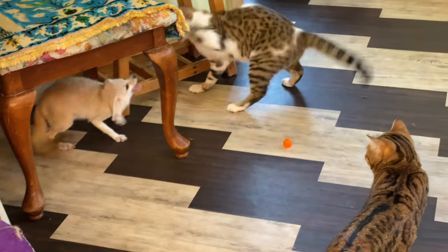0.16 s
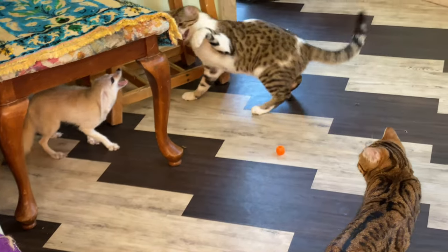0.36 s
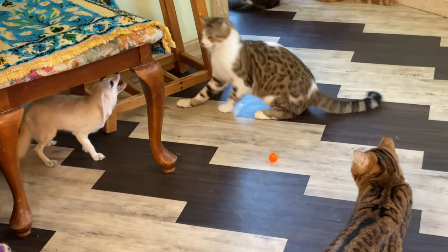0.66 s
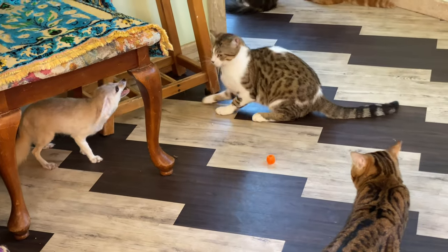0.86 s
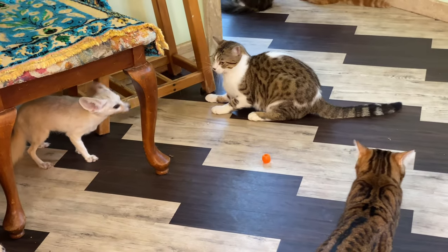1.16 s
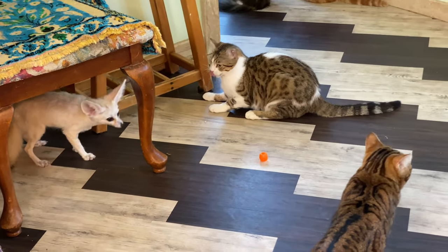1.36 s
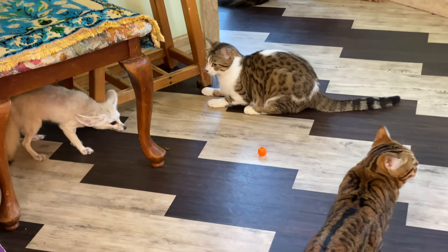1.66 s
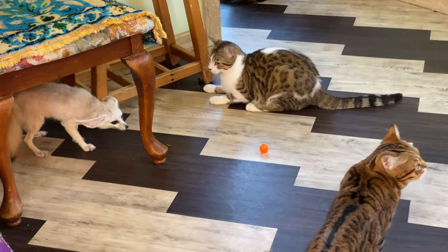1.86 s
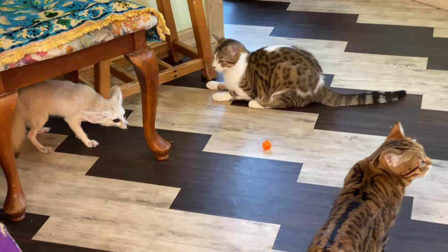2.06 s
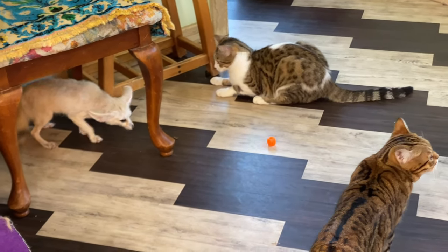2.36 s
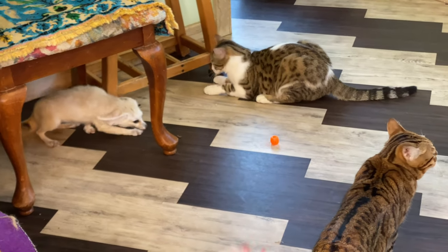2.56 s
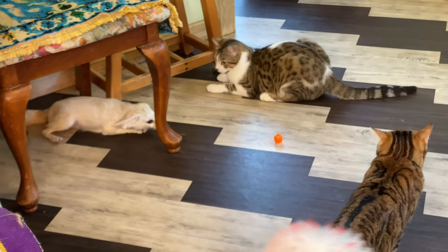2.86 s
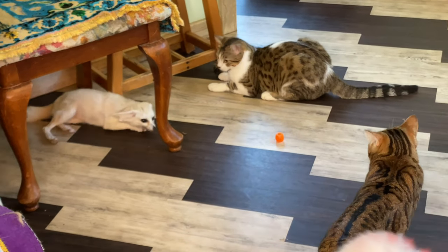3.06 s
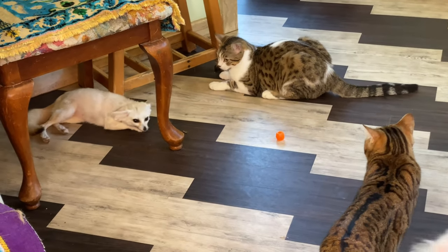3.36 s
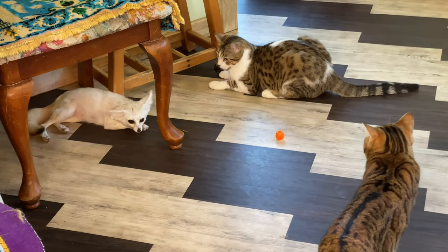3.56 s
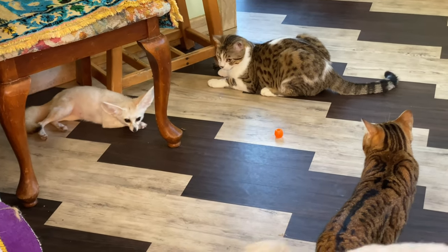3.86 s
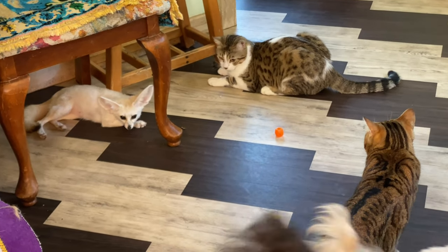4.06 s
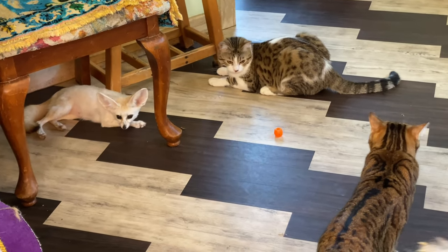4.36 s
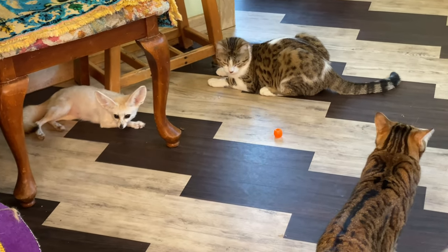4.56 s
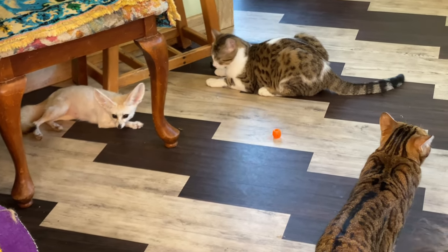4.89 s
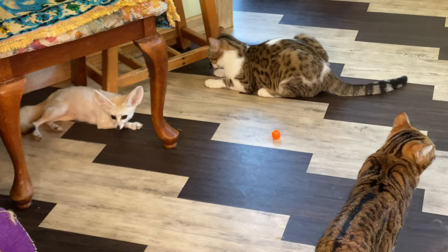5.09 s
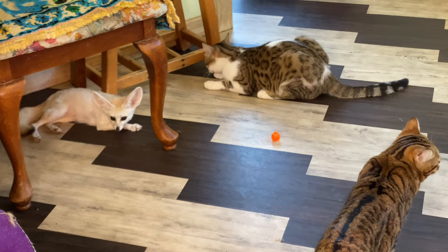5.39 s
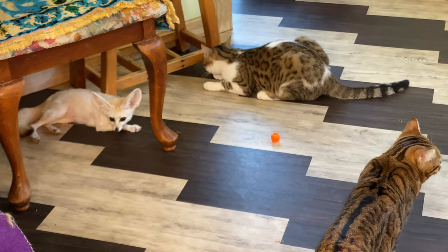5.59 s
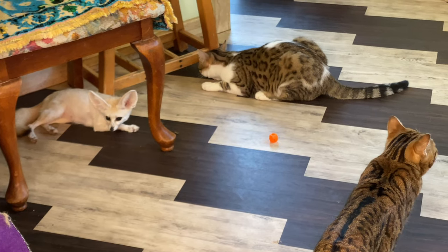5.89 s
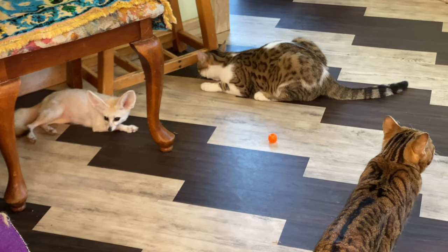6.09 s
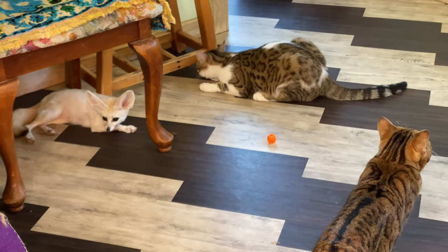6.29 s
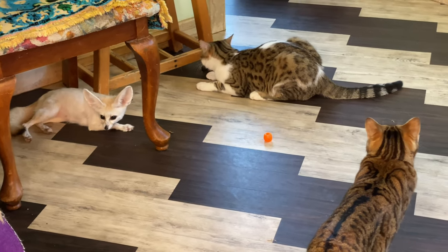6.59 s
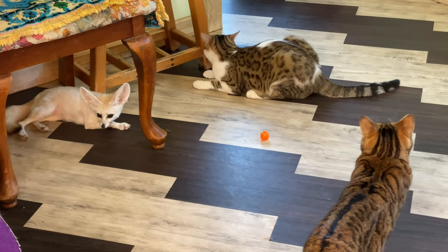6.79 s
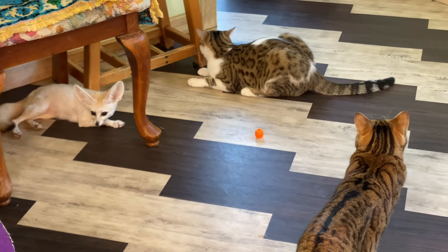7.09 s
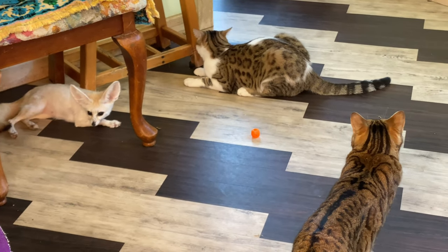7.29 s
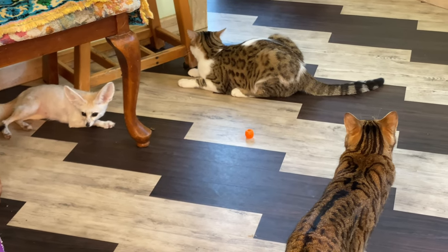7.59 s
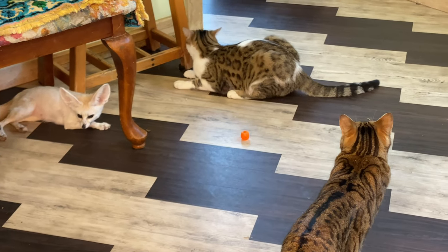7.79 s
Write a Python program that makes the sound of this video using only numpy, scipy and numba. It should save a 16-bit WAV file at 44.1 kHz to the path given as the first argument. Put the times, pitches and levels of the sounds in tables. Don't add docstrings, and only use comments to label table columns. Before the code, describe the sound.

Indoors, a fennec fox hisses and shrieks raspily, then gives bursts of nasal squawks and yelps over low house rumble, ending with tiny claw ticks.

```python
import sys
import numpy as np
from scipy import signal
from scipy.fft import rfft, irfft
from scipy.io import wavfile
from numba import njit

SR = 44100
rng = np.random.default_rng(int(sys.argv[2]) if len(sys.argv) > 2 else 0)


def dump(signal):
    limited = np.clip(np.atleast_2d(signal).T, -1, 1)
    pcm = np.round(limited * 32767).astype(np.int16)
    wavfile.write(sys.argv[1], SR, pcm)


def convert_level_to_amplitude(level_db):
    exponent = np.asarray(level_db, float) / 20
    return 10 ** exponent


N = 350138


def unit(x):
    return x / np.sqrt(np.mean(x ** 2) + 1e-20)


def along(points, hz):
    table = np.array(points, float)
    return np.interp(np.log(hz + 1), np.log(table[:, 0] + 1), table[:, 1])


def spread(rows, rise_s, fall_s):
    s, *columns = np.transpose(rows)
    first = round(s[0] * SR)
    t = np.arange(first, round(s[-1] * SR)) / SR
    gate = np.clip((t - s[0]) / rise_s, 0, 1) * np.clip((s[-1] - t) / fall_s, 0, 1)
    return first, [np.interp(t, s, c) for c in columns], gate


def drift(rate_hz):
    r = np.exp(-2 * np.pi * rate_hz / SR)
    slow = signal.lfilter([1], [1, -2 * r, r * r], rng.standard_normal(N + SR))
    return unit(slow[SR:])


def band_pass(x, low_hz, high_hz):
    return signal.sosfilt(signal.butter(2, [low_hz, high_hz], "band", fs=SR, output="sos"), x)


@njit
def resonate(x, cos_w, r):
    y = np.zeros(len(x))
    for i in range(2, len(x)):
        y[i] = (1 - r * r) / 2 * (x[i] - x[i - 2]) + 2 * r * cos_w[i] * y[i - 1] - r * r * y[i - 2]
    return y


def cavity(x, hz, width_hz):
    cos_w = np.cos(2 * np.pi * hz / SR) * np.ones(len(x))
    r = np.exp(-np.pi * width_hz / SR)
    return resonate(resonate(x, cos_w, r), cos_w, r)


def body(x, modes):
    total = 0
    for k, (hz, width_hz, db) in enumerate(modes):
        total = total + (-1) ** k * convert_level_to_amplitude(db) * unit(cavity(x, hz, width_hz))
    return unit(total)


def posture():
    # t/s, throat f/Hz, mouth f/Hz, jaw shut [0-1], lips drawn back [0-1]
    poses = [(0, 1900, 4050, .1, 0.73), (.45, 1900, 3620, .1, 0.74), (.9, 2000, 3300, 0.18, 0.78),
             (1.6, 1700, 3450, 0.73, .25), (1.8, 2200, 3300, .22, .75), (2.35, 1900, 3500, .3, .74),
             (2.9, 1720, 3350, .3, .95), (3.26, 2400, 3300, .55, .99), (3.45, 2000, 3130, .6, .8),
             (4.08, 1800, 3400, .7, .5), (4.3, 1804, 4350, 0.59, 0.3), (4.5, 1800, 4580, 0.7, 0.43),
             (4.87, 1950, 2900, .85, .3), (5.08, 1199, 2870, 0.68, .2), (5.31, 1762, 2800, 0.98, .01),
             (5.7, 1400, 2900, .5, .62), (6.199, 2200, 3900, .95, .98), (7.45, 1708, 4040, 0.49, 0.75)]
    s, *columns = np.transpose(poses)
    return [np.interp(np.arange(N) / SR, s, c) for c in columns]


def cries(throat_hz, mouth_hz):
    # t/s, f/Hz, effort level/dB
    squawks = [
        [(2.245, 610, -49), (2.295, 600, -30), (2.325, 710, -24), (2.413, 650, -34), (2.52, 700, -37)],
        [(2.55, 577, -40), (2.606, 669.6, -25.5), (2.66, 560.7, -27.5), (2.75, 586, -37)],
        [(2.835, 597, -29), (2.875, 686.3, -26), (2.92, 710, -27), (2.94, 715, -36)],
        [(3.485, 628, -38), (3.53, 675, -40), (3.575, 712, -27), (3.6, 706, -31), (3.62, 687, -43)],
        [(3.985, 642.6, -35.5), (4.021, 634.5, -36.5), (4.043, 743, -29.5), (4.125, 765.7, -32)],
    ]
    yelps = [
        [(6.085, 646.4, -39.5), (6.155, 726, -28.5), (6.185, 585, -30), (6.24, 547, -32)],
        [(6.34, 660, -27.5), (6.4, 610, -26), (6.43, 545, -30), (6.48, 527, -30)],
    ]
    whines = [
        [(4.28, 1900, -49), (4.36, 1851, -43), (4.45, 1740, -37), (4.5, 1800, -44)],
    ]
    shrieks = [
        [(4.49, 1950, -44), (4.53, 2006, -41), (4.6, 2090, -34), (4.68, 2060, -39.5), (4.81, 2050, -41)],
    ]
    screams = [
        [(.02, 946, -51), (.04, 1005, -37), (.178, 975, -46), (.25, 1053, -36.5)],
        [(.42, 1246, -44.5), (.454, 1212, -53.5), (.512, 1028, -44), (.66, 1317, -42)],
    ]
    groans = [
        [(.89, 337, -47), (1.02, 300, -51), (1.1, 286, -53)],
        [(1.755, 410, -50), (1.8, 412, -42), (1.86, 415, -50)],
        [(3.24, 500, -46), (3.28, 470, -42), (3.32, 438, -46), (3.36, 425, -52), (3.43, 422, -60)],
    ]
    peeps = [
        [(1.5, 765, -54.5), (1.58, 790, -55), (1.63, 870, -49), (1.7, 820, -48), (1.76, 769, -46)],
        [(3.33, 690, -50), (3.44, 690, -51)],
    ]
    # first, second, third partial level/dB, pitch wobble share, upper level/dB gained as mouth opens
    kinds = [(squawks, (-.3, -2.5, -16, .025, 7)), (yelps, (-20, 0.1, -17, .048, 1.5)), (whines, (0.1, -12, -25, .043, 3)),
             (shrieks, (0.1, -2.5, -11, .046, -3)), (screams, (0.1, -8, -15, .028, 3)), (groans, (-25, -9, -0.3, .009, 1.5)),
             (peeps, (-0.4, -7, -13, .013, 1.5))]
    brighten = 0.35
    throat_ring_db, mouth_ring_db, ring_width_hz = 9, 4, 260
    out = np.zeros(N)
    wobble = 0.45 * drift(45) + 0.7 * drift(200)
    throb = unit(cavity(rng.standard_normal(N), 166, 99))
    wander_db = [3.5 * drift(16) for _ in range(3)]
    for calls, (first, second, third, rough, opening_db) in kinds:
        for rows in calls:
            at, (hz, effort_db), gate = spread(rows, 0.0098, 0.011)
            part = slice(at, at + len(gate))
            opened_db = opening_db * np.linspace(-0.5, 0.5, len(gate))
            bright_db = effort_db + brighten * (effort_db - effort_db.max()) + opened_db
            first_db = effort_db + first - opened_db + wander_db[0][part]
            second_db = bright_db + second + wander_db[1][part]
            third_db = bright_db + third + wander_db[2][part]
            phase = 2 * np.pi * np.cumsum(hz * (1 + rough * wobble[part])) / SR
            upper = 0
            for k in range(3, 13):
                fall_octaves = np.log2(np.maximum(k * hz, 2400) / np.maximum(3 * hz, 2400))
                throat_gap = (k * hz - throat_hz[part]) / ring_width_hz
                mouth_gap = (k * hz - mouth_hz[part]) / ring_width_hz
                ring_db = throat_ring_db / (1 + throat_gap ** 2) + mouth_ring_db / (1 + mouth_gap ** 2)
                level = convert_level_to_amplitude(ring_db - 9 * fall_octaves) * (k * hz < 12000)
                upper = upper + level * np.sin(k * phase + k * k)
            stack = convert_level_to_amplitude(first_db) * np.sin(phase) + convert_level_to_amplitude(second_db) * np.sin(2 * phase) + convert_level_to_amplitude(third_db) * upper
            throb_db = -3.5 + (0.5 + 36 * rough) * throb[part]
            out[part] += np.sqrt(2) * gate * convert_level_to_amplitude(throb_db) * stack
    return signal.sosfilt(signal.butter(4, 480, "high", fs=SR, output="sos"), out)


def rasps(throat_hz, mouth_hz, shut, bared):
    # t/s, swell/s, length/s, peak level/dB, sag by the end/dB
    blasts = [(0.0, 0.052, .13, -15, 14), (.118, 0.09, 0.14, -20, 6), (.404, .034, .144, -16.5, 7),
              (.538, 0.07, .142, -21, 11), (0.806, 0.072, 0.25, -26.5, 14.5), (1.746, 0.056, 0.12, -28, 8),
              (3.238, .04, .14, -40, 12), (4.829, 0.0099, 0.075, -35.5, 8.5),
              (5.049, 0.021, 0.079, -52, 17), (5.29, .008, .05, -61, 4), (5.565, .003, .067, -38.5, 5.5),
              (5.815, .018, 0.052, -54, 6), (7.333, 0.13, 0.24, -51.5, 3)]
    leaks = [(1.48, .02, 0.28, -66, -2.5), (2.277, .075, 0.32, -28, 1.5), (2.575, 0.018, 0.17, -30.5, 3.5),
             (2.87, 0.069, 0.077, -40.5, .1), (3.507, 0.054, 0.14, -35, 10), (3.905, 0.018, .085, -53, 1),
             (3.99, .07, .21, -31.5, 17.5), (4.2, 0.059, 0.34, -40.5, 5.5), (4.54, .03, .29, -52, 5),
             (6.079, .035, .16, -41, 2.5), (6.33, .03, 0.15, -45, 1.5)]
    # f/Hz, width/Hz, level/dB
    narrow_modes, chest_modes = [(2150, 150, -6), (2900, 150, 0), (3400, 150, 0), (3660, 120, -2),
                                (4050, 150, -3)], [(416, 350, 1.5), (806, 587, -2)]
    teeth_modes, lip_modes = [(5730, 2200, 0.5), (8100, 2100, 0)], [(9150, 1400, 4), (10640, 1800, -12.5), (13100, 2900, -8.5)]
    chest_range, throat_range = (-34, 5), (-18.5, 12)
    teeth_range, lip_range = (-27, -1), (-38.5, -0.5)
    slaps = (rng.random(N) < 330 / SR) * rng.uniform(0.33, 1, N)
    puffs = signal.lfilter([1], [1, -np.exp(-1 / (0.0021 * SR))], slaps)
    air, hiss = (1.2 + puffs) * rng.standard_normal((2, N))

    mouth = unit(cavity(air, mouth_hz, 1500))
    mouth = mouth + convert_level_to_amplitude(-4) * unit(cavity(hiss, 1.3 * mouth_hz, 1700))
    mix = unit(mouth + convert_level_to_amplitude(-19) * body(air, narrow_modes))
    chest = convert_level_to_amplitude(-12 * bared) * body(hiss, chest_modes)
    throat = unit(cavity(hiss, throat_hz, 800))
    parts = [(chest, chest_range, shut), (throat, throat_range, shut),
             (body(hiss, teeth_modes), teeth_range, bared), (body(air, lip_modes), lip_range, bared)]
    for part, (low_db, high_db), pose in parts:
        mix = mix + convert_level_to_amplitude(low_db + (high_db - low_db) * pose) * part

    breath = np.zeros(N)
    for s, swell_s, length_s, peak_db, sag_db in blasts + leaks:
        peak_s = s + np.clip(swell_s, 0.001, length_s - 0.001)
        rows = [(s, peak_db - 11.5), (peak_s, peak_db), (s + length_s, peak_db - sag_db)]
        at, (level_db,), gate = spread(rows, 0.005, 0.023)
        breath[at:at + len(gate)] += gate * convert_level_to_amplitude(level_db - 1.5)
    return breath * mix


def ticks():
    # t/s, peak level/dB
    claws = [
        (7.008, -57.5),
        (7.0848, -45),
        (7.385, -47),
    ]
    clicks = np.zeros(N)
    for s, db in claws:
        clicks[round(s * SR)] = convert_level_to_amplitude(db)
    fading = signal.lfilter([1], [1, -np.exp(-1 / (0.011 * SR))], clicks + 1e-18)
    return cavity(fading * rng.standard_normal(N), 7750, 5600)


def thuds():
    # t/s, peak level/dB
    paws = [
        (1.024, -49),
        (4.487, -37),
        (4.556, -40),
    ]
    clicks = np.zeros(N)
    for s, db in paws:
        clicks[round(s * SR)] = convert_level_to_amplitude(db + 44.5)
    return cavity(clicks, 199, 100)


def room(x, wet_db):
    # f/Hz, time to fade by 60 dB/s
    fade_times = [(400, .8), (1000, 0.66), (2800, 0.61), (7400, 0.58), (14000, 0.48)]
    t = np.arange(SR) / SR
    white, tail = rng.standard_normal((2, SR)), 0
    for hz in 180 * 2 ** np.arange(7):
        octave = band_pass(white, hz / np.sqrt(2), hz * np.sqrt(2))
        tail = tail + octave * convert_level_to_amplitude(-60 * t / along(fade_times, hz))
    tail = tail * np.clip((t - 0.003) / 0.0036, 0, 1)
    tail = convert_level_to_amplitude(wet_db) * tail / np.sqrt(np.sum(tail[0] ** 2))
    echoes = signal.fftconvolve(x[None], tail, axes=1)[:, :N]
    return echoes * [[1], [1.5]] + x * [[1], [0]]


def house():
    # f/Hz, level per Hz/dB
    air_colour = [(41, -32.5), (70, -8.5), (173, -7), (243, -2.5), (297, -2.5), (333, -17), (599, -13.5),
                  (655, -11.5), (751, -20.5), (1350, -22.5), (1510, -28), (4680, -33.5), (10600, -34),
                  (13500, -51.5), (15500, -44)]
    # t/s, level/dB
    far_steps = [
        (.93, -33.5),
        (1.1, -41),
        (1.83, -45),
        (2.52, -44),
        (4.75, -45),
        (5.24, -47),
        (5.5, -45.5),
        (6.19, -42),
        (6.5, -43),
        (7.74, -43),
    ]
    hz, t = np.arange(N // 2 + 1) * SR / N, np.arange(N) / SR
    air = irfft(rfft(rng.standard_normal((2, N))) * convert_level_to_amplitude(along(air_colour, hz)), N)
    low = band_pass(rng.standard_normal((2, N)), 34, 60)
    shake = convert_level_to_amplitude(-50 - 12 * (t < 0.98))
    for s, db in far_steps:
        fade_s = np.where(t < s, 0.038, 0.091)
        shake = shake + convert_level_to_amplitude(db) * np.exp(-np.abs(t - s) / fade_s)
    hum = cavity(rng.standard_normal(N), 101.6, 9)
    return convert_level_to_amplitude(-54.5) * unit(air) + shake * unit(low) + convert_level_to_amplitude(-59) * unit(hum) * [[1], [0]]


def microphone(shared, unshared):
    # f/Hz, phase by which left leads/rad
    port_phase = [(0, 0), (860, -.45), (2200, 0), (3100, .6), (4600, .4), (6600, 0), (7900, 0), (8350, 1.9),
                  (9500, 1.7), (10500, 0), (11700, 0), (12500, -3), (14400, -3.2), (15100, -6.2)]
    # f/Hz, unshared level/dB
    unlike = [(60, -13.5), (300, -20.5), (700, -10), (1400, -5), (2000, -32.5), (3500, -31), (6500, -38),
              (15000, -34)]
    # f/Hz, level/dB
    mic_tone = [(100, -2), (1000, 3), (3000, 3), (7600, -6.5), (8600, -3.5), (9800, -5), (11000, -5),
                (12500, 1.5), (13500, -11), (15000, -9)]
    hz = np.arange(N // 2 + 1) * SR / N
    common, apart = rfft(shared), rfft(unshared) * convert_level_to_amplitude(along(unlike, hz))
    turn = np.exp(0.5j * along(port_phase, hz))
    ports = np.array([(common + apart) * turn, (common - apart) / turn])
    return irfft(ports * convert_level_to_amplitude(along(mic_tone, hz)), N)


def scene():
    throat_hz, mouth_hz, shut, bared = posture()
    fox = cries(throat_hz, mouth_hz) + rasps(throat_hz, mouth_hz, shut, bared)
    shared, unshared = room(fox + ticks() + thuds(), wet_db=0.5) + house()
    return microphone(shared, unshared)


def roll_off(x):
    return signal.sosfilt(signal.butter(12, 15940, fs=SR, output="sos"), x)


def record(dry):
    return roll_off(dry)


dry = scene()
out = record(dry)
dump(out)
```